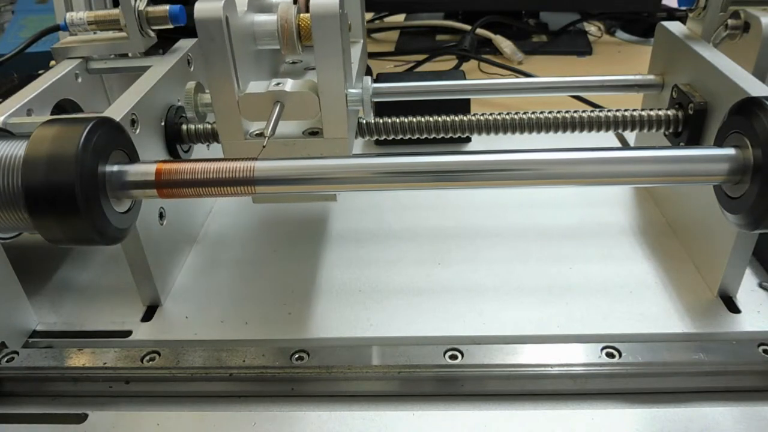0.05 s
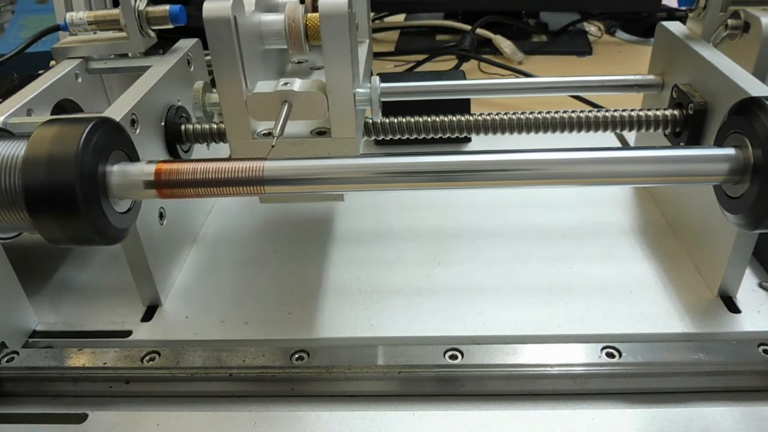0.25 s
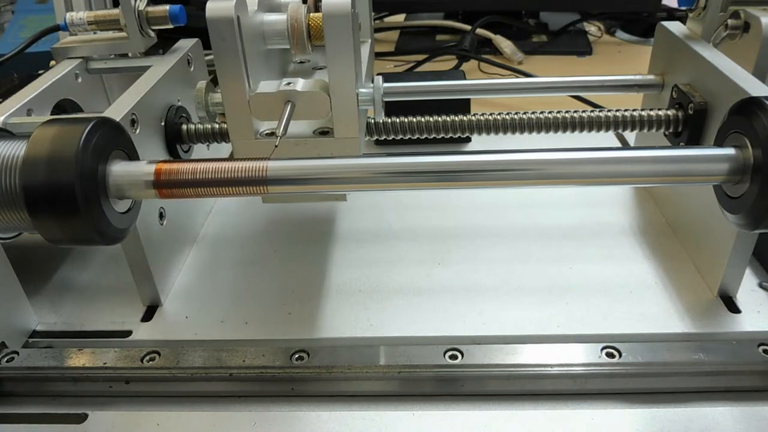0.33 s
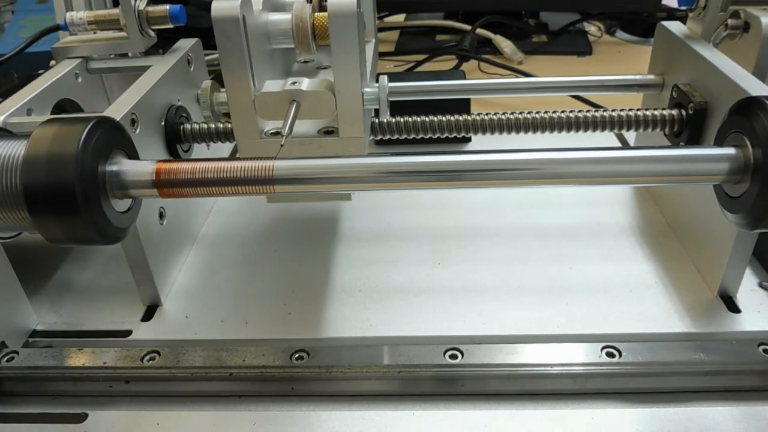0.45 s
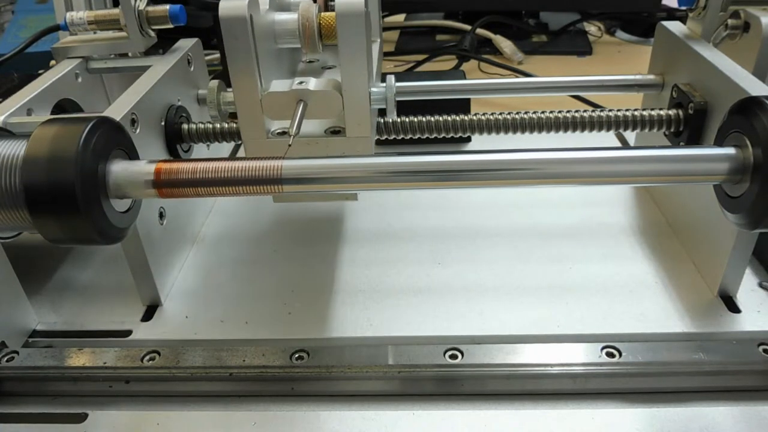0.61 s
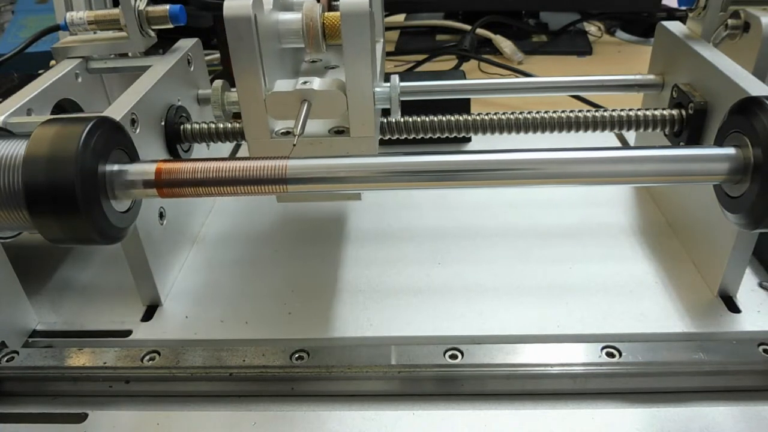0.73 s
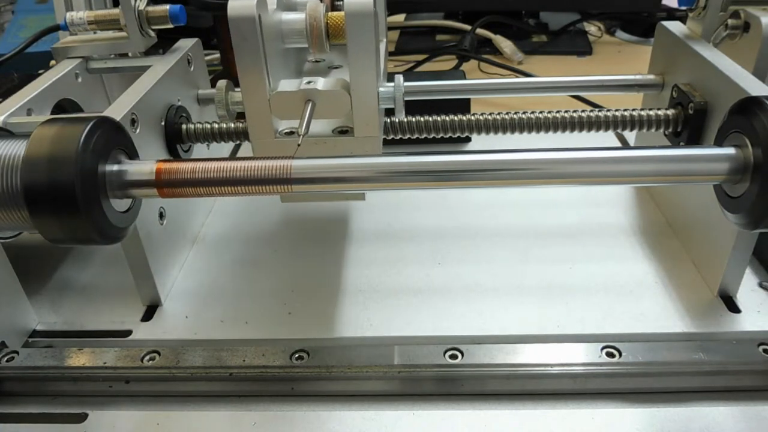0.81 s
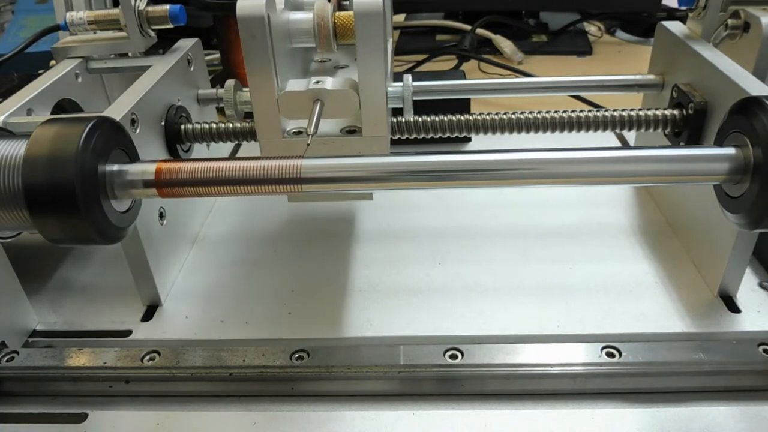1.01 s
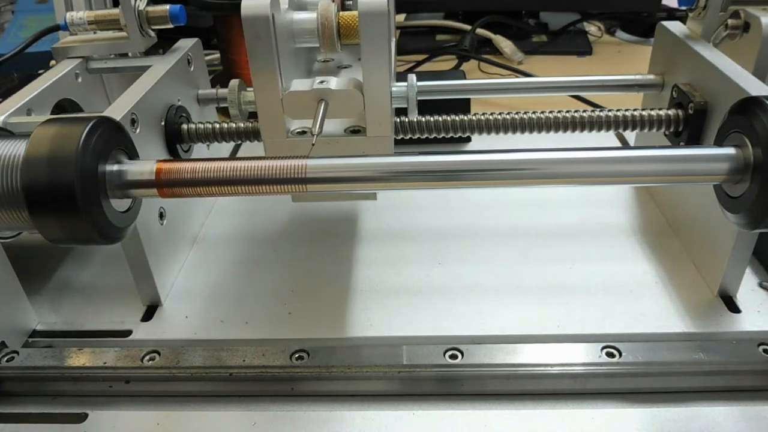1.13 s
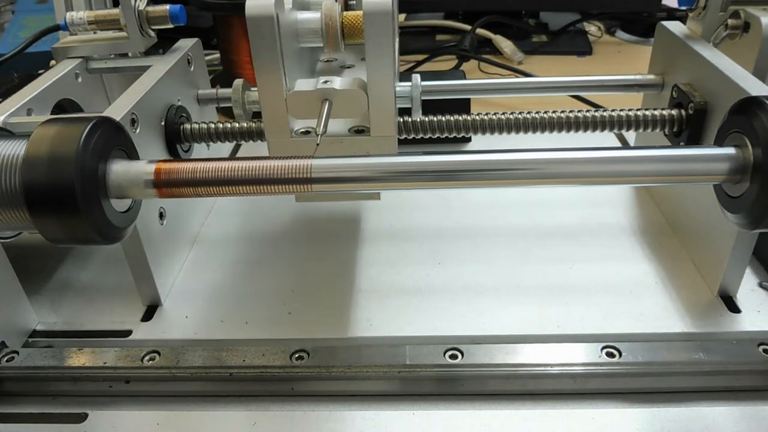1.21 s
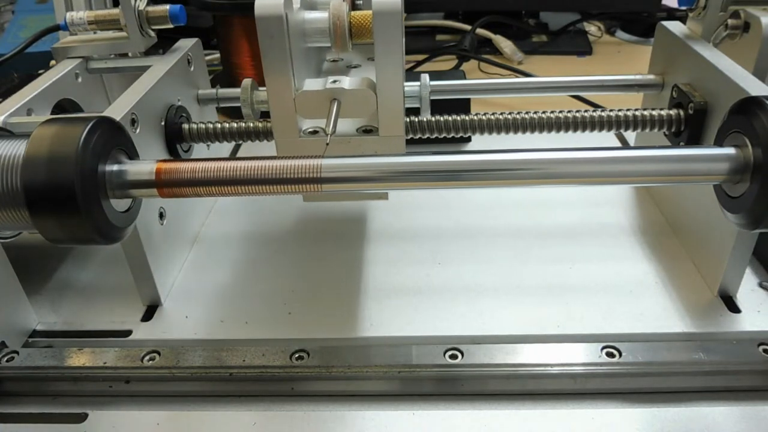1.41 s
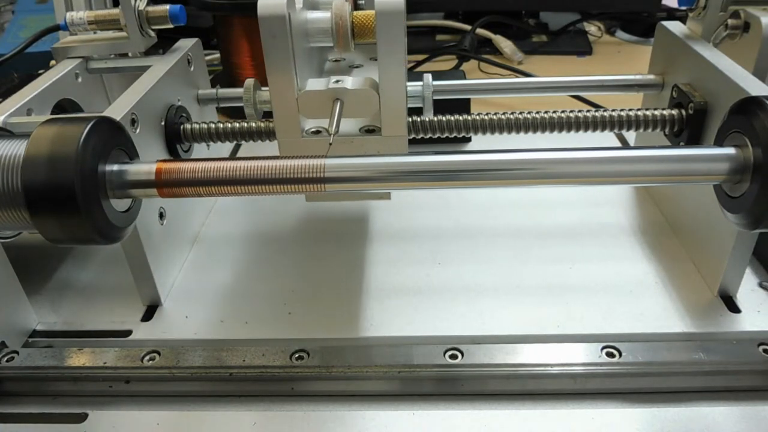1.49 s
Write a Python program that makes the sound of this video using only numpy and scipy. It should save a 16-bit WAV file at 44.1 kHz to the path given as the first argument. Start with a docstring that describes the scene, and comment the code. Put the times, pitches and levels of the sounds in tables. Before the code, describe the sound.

A small coil winding machine runs close by throughout, with a throbbing motor hum, whirring bearings and a faint, high warbling whistle. A whine swells from 0.2 seconds and creeps upward while the wire ticks lightly. At 0.6 seconds the mechanism gives a short, clattering metallic knock with a brief room echo. A softer knock follows at 1.25 seconds, then the whine fades and the motor keeps running.

```python
"""A small coil winder is already running on a workbench: its stepper motor sings at multiples of the step
rate and throbs with each turn, while a thin whistle warbles over a hum and the whirr of the bearings.
The spindle whine swells and creeps upward, and the wire ticks lightly now and then as it settles.
At 0.6 s the mechanism knocks against its frame and the room answers briefly. A softer knock follows
at 1.25 s; then the whine fades and the motor runs on."""
import sys
import numpy as np
from scipy import signal
from scipy.fft import rfft, irfft
from scipy.io import wavfile

SR = 44100
rng = np.random.default_rng(int(sys.argv[2]) if len(sys.argv) > 2 else 0)


def transcribe(signal):
    """Save signal, clipped to [-1, 1], as a 16-bit WAV file at the path in sys.argv[1]."""
    frames = np.atleast_2d(signal).T
    limited = np.clip(frames, -1, 1)
    pcm = np.round(limited * 32767).astype(np.int16)
    wavfile.write(sys.argv[1], SR, pcm)


N = 68355
T = np.arange(N) / SR

# stepper harmonics: multiple of the step rate
STEP_HARMONICS = [2, 4, 5, 7, 9, 11]
# strength of each of those harmonics: level/dB
STEP_LEVELS = [-56, -43.5, -58, -65.5, -66, -66.5]
# glide and fade of the spindle whine: t/s, f/Hz, level/dB
SPINDLE_WHINE = [(0, 742, -41), (.1, 744, -41.5), (.2, 748, -37), (.35, 753, -34), (.56, 762, -36),
                 (.75, 768, -36), (.95, 774, -40), (1.22, 782, -38.5), (1.33, 786, -45), (1.55, 787, -51)]
# contacts of the two knocks: t/s, body modes/dB, upper modes/dB, upper tilt/(dB per octave),
# clatter/dB, clatter decay/s
KNOCK_CONTACTS = [(0.607, -17, -23, -3, -36, 0.0098), (0.6184, -19, -17.5, -3, -21, 0.019),
                  (.6266, -26, -11.5, 4.5, -23.5, 0.014), (0.6392, -23.5, -21.5, -9, -39, 0.0082),
                  (1.2531, -22.5, -20, 1.5, -25.5, 0.011), (1.258, -35.5, -26.5, -9.5, -31, 0.014)]
# ringing modes of the frame: f/Hz, relative level/dB, t60/s
FRAME_MODES = [(632, -10.5, 0.21), (620.7, 0.5, 0.16), (684.7, 5, 0.12), (753.4, -1, 0.14),
               (872, -11.5, 0.071), (1188, -10, 0.072), (1262, -11.5, 0.11), (1368, -15, 0.12),
               (1404, -16.5, 0.2), (1885, -5.5, 0.048), (2370, -11, 0.046), (2577, -12.5, 0.054),
               (3070, -17, 0.067), (3129, -13, 0.07)]
# colour of the clatter: f/Hz, relative level/dB
CLATTER_SPECTRUM = [(60, -5), (110, -19), (200, 1.5), (500, -4), (620, 9), (740, 10), (1000, -12),
                    (1300, 16.5), (1550, 7), (1850, 13), (2200, 3), (3150, -4), (3600, -2), (6000, -19),
                    (12000, -16.5)]
# ticks of the wire: t/s, level/dB, centre f/Hz, width/Hz
WIRE_TICKS = [(.157, -42, 2450, 396), (.482, -45, 6860, 1500), (0.486, -33.5, 2580, 500),
              (0.894, -55, 7250, 1490), (1.165, -60, 7200, 1500), (1.344, -66, 9000, 4000)]
# drifting centre of the whistle: t/s, f/Hz
WHISTLE_PITCH = [(0, 11500), (.2, 10900), (.42, 11700), (.7, 11200), (.9, 10300), (1.22, 10800),
                 (1.55, 10100)]
# hum of the drive and frame: f/Hz, level/dB, unsteadiness (0 pure tone, 1 all noise)
HUM_TONES = [(227.9, -58, 0.4), (499.5, -51, 0.29), (576.5, -53, 0.26), (683, -51.5, 1), (749, -56, 1),
             (1008.5, -57.5, 0), (1097, -57.5, 0.92), (1360, -62.5, 0.7)]
# colour of the bearing whirr: f/Hz, relative level/dB
WHIRR_SPECTRUM = [(25, -21.5), (100, -13), (185, -10), (234, -5), (425, -5.5), (540, -9.5), (690, 0.5),
                  (850, -6), (1230, -11), (1870, -12.5), (2050, -7.5), (2550, -13), (2850, -15),
                  (3400, -15.5), (5000, -20), (8000, -23), (11200, -24), (12500, -26.5)]


def stepper(step_hz=666.7, steps_per_turn=50, flutter_db=.35):
    """Step harmonics throb once and twice a shaft turn; a cogging tone on top swells once a turn."""
    turn_hz = step_hz / steps_per_turn
    angle = 2 * np.pi * turn_hz * (T - .071)
    throb = 1 + .22 * np.cos(angle) + .16 * np.cos(2 * angle)
    harmonics = sum(tone(k * step_hz) * undb(db + flutter_db * wander(43))
                    for k, db in zip(STEP_HARMONICS, STEP_LEVELS))
    swell = 1 + .4 * np.cos(2 * np.pi * turn_hz * (T - .015))
    cogging = tone(151 * turn_hz) * undb(-44 + flutter_db * wander(33))
    return throb * harmonics + swell * cogging


def spindle(flutter_db=1.5):
    """The spindle's whine creeps up in pitch as it swells, holds and fades."""
    level_db = curve(SPINDLE_WHINE, column=2) + flutter_db * wander(31)
    return tone(curve(SPINDLE_WHINE)) * undb(level_db)


def knocks(upper_from_hz=1000, tilt_pivot_hz=1800):
    """The mechanism hits its frame: each contact rings the frame's modes and adds a noisy clatter."""
    ring, clatter = np.zeros(N), np.zeros(N)
    for start, body_db, upper_db, tilt, clatter_db, clatter_decay in KNOCK_CONTACTS:
        for hz, db, t60 in FRAME_MODES:
            if hz < upper_from_hz:
                drive_db, attack = body_db, .0033
            else:
                drive_db, attack = upper_db + tilt * np.log2(hz / tilt_pivot_hz), .0044
            envelope = burst(start, attack, t60 / np.log(1000))
            ring += undb(drive_db + db) * envelope * np.sin(2 * np.pi * hz * (T - start))
        clatter += undb(clatter_db) * coloured(CLATTER_SPECTRUM) * burst(start, .0024, clatter_decay)
    low_cut = signal.butter(6, 540, "high", fs=SR, output="sos")
    return clatter + signal.sosfilt(low_cut, ring)


def wire_ticks(attack_s=.00021, decay_s=.0088):
    """The wire settles on the coil with light ticks, each a snap of narrow-band noise."""
    return sum(undb(db) * burst(start, attack_s, decay_s) * band(hz, width / 2)
               for start, db, hz, width in WIRE_TICKS)


def whistle(warble_hz=28.44, swing_hz=663):
    """A thin, airy whistle with an uneven warble, loudest where its pitch dips."""
    rate_hz = warble_hz * (1 + .14 * wander(20))
    angle = 2 * np.pi * np.cumsum(rate_hz) / SR
    warble = np.cos(angle) + .3 * np.cos(2 * angle)
    drift_hz, blur_hz = 348 * wander(25), 200 * wander(900)
    hz = curve(WHISTLE_PITCH) + swing_hz * warble + drift_hz + blur_hz
    level_db = -61 - 4.5 * np.cos(angle) + 2.5 * wander(76)
    return undb(level_db) * tone(hz)


def hum(half_width_hz=22.6):
    """The drive and frame hum: a bed of tones, made unsteady by blending in narrow noise."""
    out = np.zeros(N)
    for hz, db, unsteady in HUM_TONES:
        blur = band(hz, half_width_hz)
        out += undb(db) * (np.sqrt(1 - unsteady ** 2) * tone(hz) + unsteady * blur)
    return out


def bearings(level_db=-43, flicker_db=.99):
    """The bearings lay a broad, slightly flickering whirr under everything."""
    return coloured(WHIRR_SPECTRUM) * undb(level_db + flicker_db * wander(28))


def room(sound, wet_db=-10, t60_s=.3):
    """The sound plus the room's answer, a short tail of diffuse reflections."""
    tail = rng.standard_normal(N) * burst(0, .013, t60_s / np.log(1000))
    return sound + undb(wet_db) * signal.fftconvolve(sound, unit(tail) / np.sqrt(N))[:N]


def undb(db):
    """Decibels to gain."""
    return 10 ** (np.asarray(db) / 20)


def unit(x):
    """Scale to rms 1."""
    return x / np.sqrt(np.mean(x ** 2))


def curve(rows, column=1):
    """One column of a table, joined by straight lines in time."""
    rows = np.array(rows)
    return np.interp(T, rows[:, 0], rows[:, column])


def noise(gain):
    """Noise of rms 1 whose spectrum is shaped by gain(f)."""
    f = np.arange(N + 1) * SR / (2 * N)
    white = rfft(rng.standard_normal(2 * N))
    return unit(irfft(white * gain(np.maximum(f, 1)))[:N])


def coloured(points):
    """Noise of rms 1 through an EQ curve of f/Hz, level/dB points."""
    hz, db = np.array(points).T
    return noise(lambda f: undb(np.interp(np.log(f), np.log(hz), db)))


def band(hz, half_width_hz):
    """Noise of rms 1 gathered around one pitch."""
    return noise(lambda f: 1 / (1 + ((f - hz) / half_width_hz) ** 2))


def wander(rate_hz):
    """Smooth random modulation of rms 1, rolling off above rate_hz."""
    return noise(lambda f: np.exp(-(f / rate_hz) ** 2))


def tone(hz):
    """A sine of rms 1 on a steady or moving pitch."""
    cycles = np.cumsum(hz * np.ones(N)) / SR
    return np.sqrt(2) * np.sin(2 * np.pi * (cycles + rng.random()))


def burst(start, attack, decay):
    """A percussive envelope: quick rise, exponential fall, times in seconds."""
    age = np.maximum(T - start, 0)
    return (1 - np.exp(-age / attack)) * np.exp(-age / decay)


def scene():
    """The whole winder, close up and mono; only the knocks get the room."""
    running = stepper() + spindle() + hum() + bearings() + whistle()
    return (running + room(knocks()) + wire_ticks())[None]


def record(dry, top_hz=12400):
    """A steep high cut takes off the very top."""
    return signal.sosfilt(signal.ellip(8, .2, 70, top_hz, fs=SR, output="sos"), dry)


dry = scene()
out = record(dry)
transcribe(out)
```